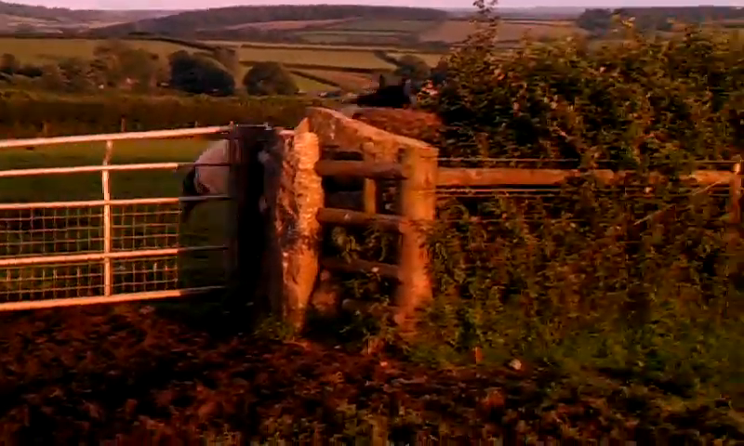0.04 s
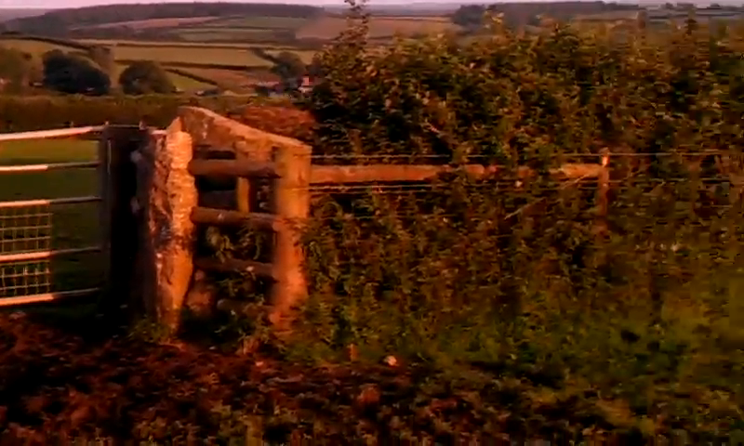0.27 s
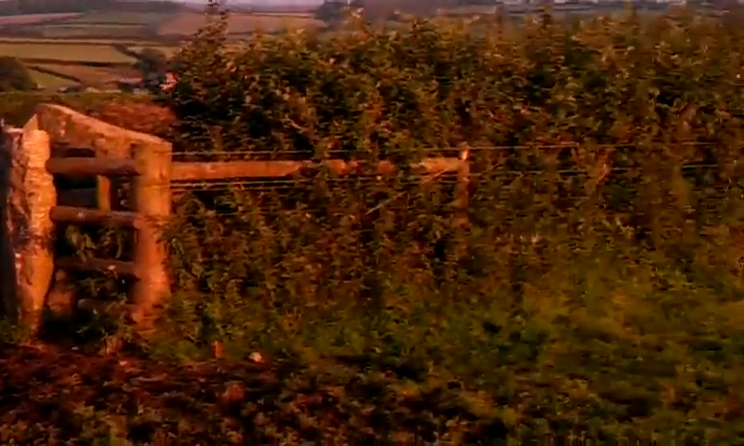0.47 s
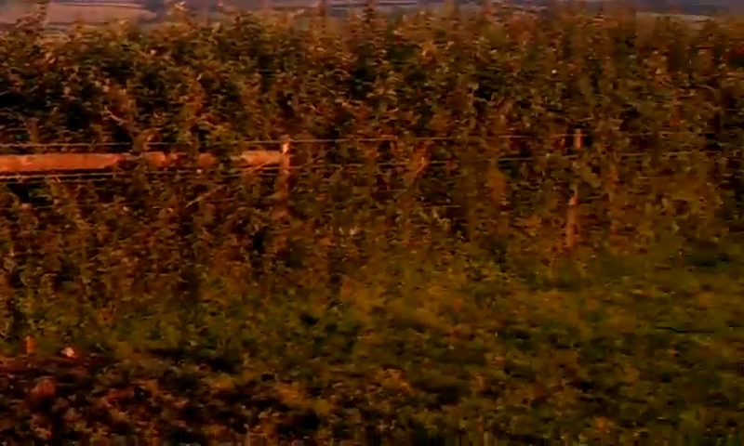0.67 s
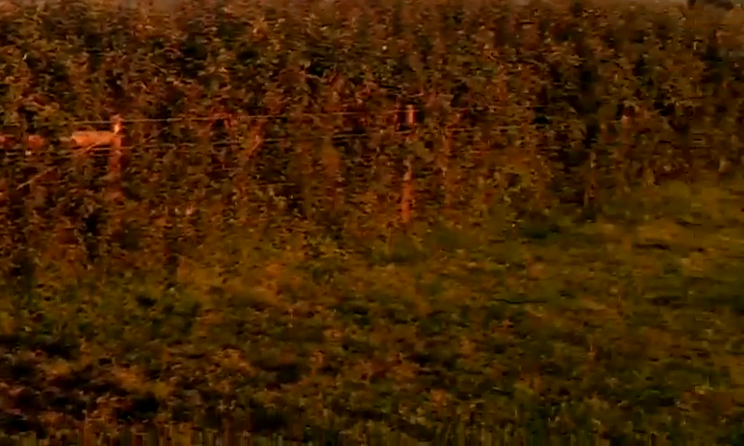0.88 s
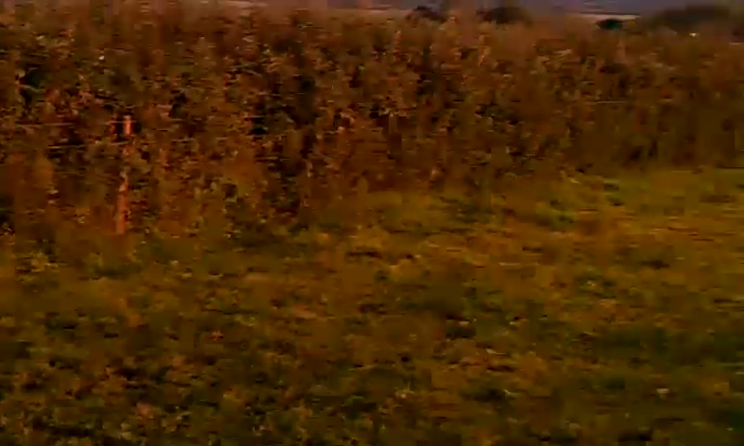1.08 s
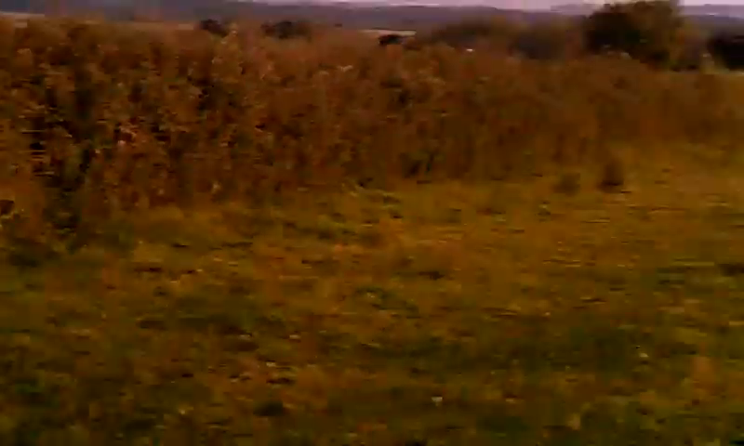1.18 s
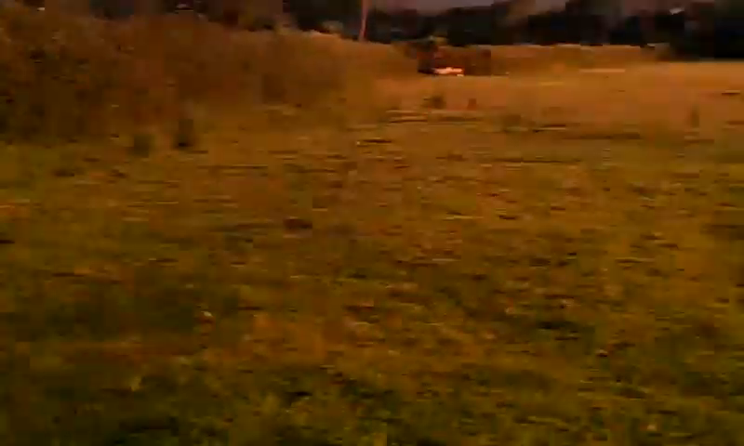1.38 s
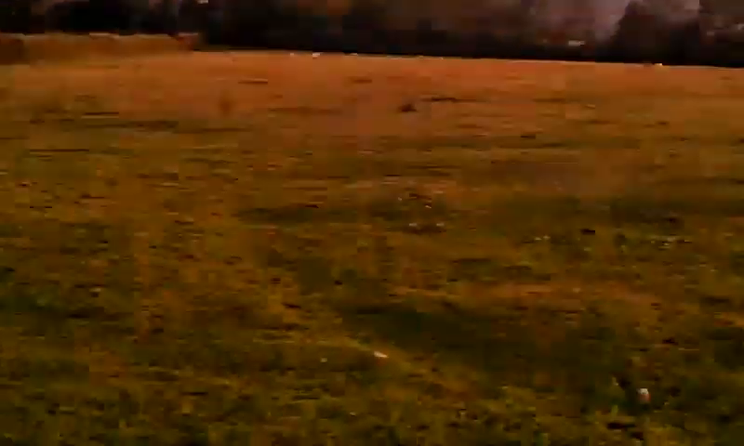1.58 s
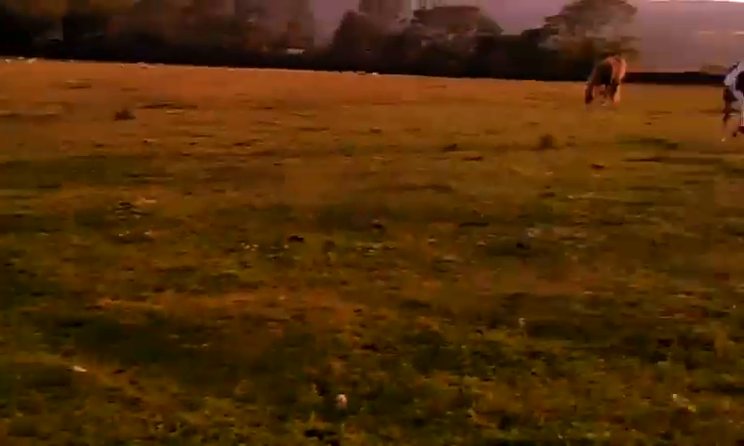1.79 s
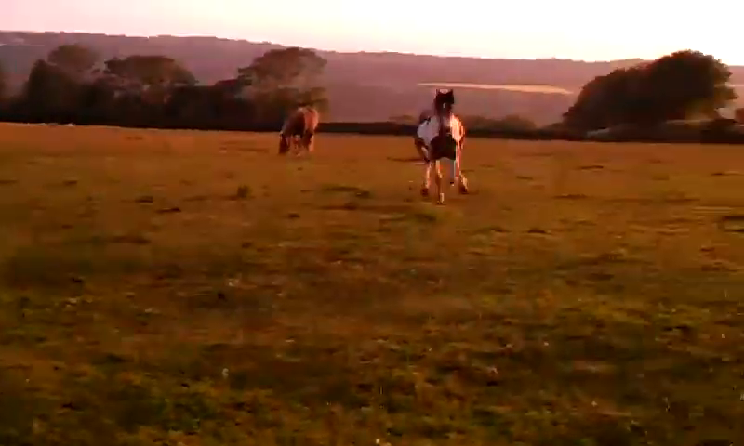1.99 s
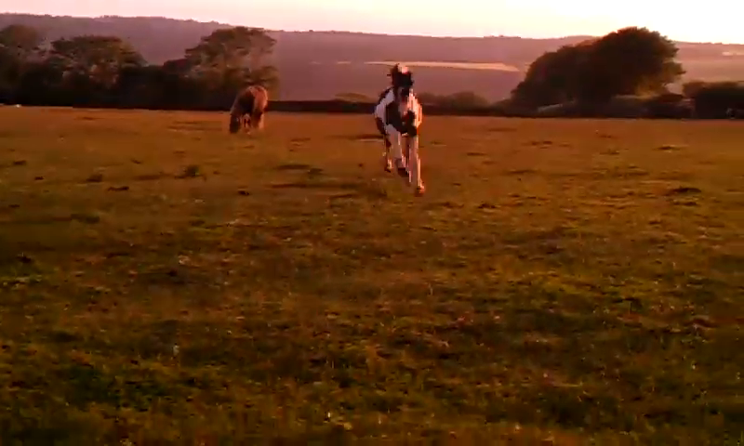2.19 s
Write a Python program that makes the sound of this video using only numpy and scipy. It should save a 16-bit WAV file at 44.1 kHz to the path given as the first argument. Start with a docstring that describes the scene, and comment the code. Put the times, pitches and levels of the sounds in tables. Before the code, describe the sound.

A horse gives one loud, shrill whinny in an open field, ending in a short rasp. Before it, a hand-held microphone knocks and rubs over faint wind and hiss. Soft thuds and two ticks follow.

```python
"""Faint wind, hiss and a rustle come first, with the knocks and rubbing of a swinging hand-held camera.
Then a horse in an open field gives one shrill whinny that arches, breaks off and ends in a short rasp.
Its voice is a high whistle, modulated by a lower second tone and roughened by turbulent breath.
Each knock excites the damped modes of the camera body, and the grip judders by stick and slip.
Soft thuds and two sharp ticks follow the call."""
import sys
import numpy as np
from scipy import signal
from scipy.fft import rfft, irfft
from scipy.io import wavfile

SR = 44100
rng = np.random.default_rng(int(sys.argv[2]) if len(sys.argv) > 2 else 0)


def put_to_file(sound):
    """Save the sound as 16-bit audio at rate SR, in the file named by the first command-line argument."""
    columns = np.atleast_2d(sound).T  # one column per channel
    safe = np.clip(columns, -1, 1)
    whole_steps = np.round(safe * 32767)
    wavfile.write(sys.argv[1], SR, whole_steps.astype(np.int16))


N = 99225


def from_db(db):
    """Amplitude ratio of a level in decibels."""
    return 10 ** (np.asarray(db) / 20)


def unit_power(x):
    """Normalisation to a mean square of one."""
    return x / np.sqrt(np.mean(x ** 2) + 1e-20)


def in_time(rows):
    """Linear interpolation of each column of a time table at every sample."""
    times, *columns = np.transpose(rows)
    return [np.interp(np.arange(N) / SR, times, column) for column in columns]


def envelope(rows):
    """Amplitude envelope of a level curve."""
    return from_db(in_time(rows)[0])


def gain_at(spectrum, hz):
    """Magnitude response, interpolated in decibels over log frequency."""
    knots, db = np.transpose(spectrum)
    return from_db(np.interp(np.log(np.maximum(hz, 1)), np.log(knots), db))


def coloured(x, spectrum):
    """Spectral shaping, normalised to unit power."""
    return unit_power(irfft(rfft(x) * gain_at(spectrum, np.arange(N // 2 + 1) * SR / N), N))


def noise(spectrum):
    """Stationary Gaussian noise with a given spectrum."""
    return coloured(rng.standard_normal(N), spectrum)


def cut(x, hz, kind="low", order=2):
    """Butterworth low- or high-pass filtering."""
    return signal.sosfilt(signal.butter(order, hz, kind, fs=SR, output="sos"), x)


def drift(hz):
    """Band-limited random fluctuation of unit power."""
    return unit_power(cut(rng.standard_normal(2 * N), hz)[N:])


def bursts(rows, spectrum, rise_s, t60_s):
    """Noise transients with linear rise and exponential decay."""
    t, level = np.arange(N) / SR, np.zeros(N)
    for peak_s, db in rows:
        rise = np.clip(1 + (t - peak_s) / rise_s, 0, 1)
        level += rise * from_db(db - 60 * np.maximum(t - peak_s, 0) / t60_s)
    return level * noise(spectrum)


def wind():
    """Turbulent pressure fluctuations at the microphone make a low rumble."""
    # gust strength (time [s], level [dB])
    gusts = [(0, -46), (.3, -43), (.5, -42), (.72, -46), (.88, -51), (1.2, -50), (1.5, -54), (1.7, -52),
             (1.9, -73), (2.25, -73)]
    # turbulence spectrum (frequency [Hz], gain [dB])
    spectrum = [(15, 1), (35, 7.5), (70, 0.5), (130, -6), (250, -16), (600, -44.5)]
    return envelope(gusts) * noise(spectrum)


def hiss():
    """Broadband background noise under slow amplitude modulation."""
    # hiss strength (time [s], level [dB])
    levels = [(0, -50.5), (.2, -59.5), (.45, -56.5), (.7, -51.5), (1.1, -60), (1.45, -54), (1.65, -50.5),
              (1.85, -55)]
    # hiss spectrum (frequency [Hz], gain [dB])
    spectrum = [(20, 10.5), (100, 11), (300, -6.5), (700, -5.5), (1500, -8), (3200, -13), (5000, -10),
                (7500, -6.5), (10000, -17), (16000, -21.5)]
    return envelope(levels) * noise(spectrum)


def rustle():
    """Random amplitude modulation makes mid-range noise grainy; short scuffs stand out of it."""
    # rustle strength (time [s], level [dB])
    levels = [(0, -50.5), (.055, -53.5), (.09, -58.5), (.15, -59), (.18, -69), (.3, -85)]
    # rustle spectrum (frequency [Hz], gain [dB])
    spectrum = [(300, -9), (700, -1.5), (1650, -12.5), (2150, -2), (2900, -19), (3800, -15), (5000, -40)]
    # scuff peaks (time [s], level [dB])
    scuffs = [(.015, -56), (.1205, -46.5), (.1405, -47)]
    # scuff spectrum (frequency [Hz], gain [dB])
    scuff_spectrum = [(1400, -21), (2100, 0), (2500, -10), (3000, -23), (12000, -30)]
    grain = unit_power(from_db(3 * drift(hz=22)))
    rustling = envelope(levels) * noise(spectrum) * grain
    return rustling + bursts(scuffs, scuff_spectrum, rise_s=0.0033, t60_s=0.071)


def rubbing():
    """Sliding friction of a hand on the camera makes low-frequency noise."""
    # friction strength (time [s], level [dB])
    levels = [(0, -43), (.13, -53), (.19, -39), (.26, -49), (.30, -32), (.34, -57), (.38, -28.5),
              (.43, -50), (.49, -16.5), (.55, -42.5), (.59, -37.5), (.66, -21), (.70, -42), (.75, -31.5),
              (.83, -30), (.90, -26), (.96, -28), (1.0, -20), (1.05, -42), (1.12, -51), (1.19, -54),
              (1.42, -57.5), (1.55, -61.5), (1.61, -40.5), (1.7, -69), (2.25, -70)]
    # friction spectrum (frequency [Hz], gain [dB])
    spectrum = [(20, -8), (50, 4.5), (90, 2.5), (140, 1), (220, -5.5), (340, -14), (500, -23.5), (800, -34),
                (1500, -114)]
    return envelope(levels) * noise(spectrum)


def knocks():
    """Impacts excite damped modes of the camera body; softer contact passes less treble."""
    # impacts (time [s], peak level [dB], cut-off [Hz])
    impacts = [(0.087, -29, 520), (0.216, -18.5, 477), (.377, -28, 784), (.383, -18.5, 704),
               (0.403, -26.5, 353), (0.4814, -14.5, 900), (0.4952, -8, 840), (0.5036, -15.5, 930),
               (0.5068, -10.5, 655), (0.573, -25, 443), (0.603, -25.5, 420), (0.6429, -6.5, 920),
               (.646, -9, 1050), (0.652, -19.5, 664), (.663, -19.5, 850), (0.673, -16.5, 970),
               (0.7874, -13.5, 466), (0.812, -26, 420), (0.886, -17, 413), (0.982, -31, 330),
               (0.996, -31, 347), (1.025, -20.5, 477), (2.2249, -28.5, 804)]
    # body modes (frequency [Hz], level [dB], T60 [s])
    modes = [(116, -7, 0.022), (200, 1.5, 0.014), (318, -19, 0.031)]
    push_t60_s, low_cut_hz = 0.0084, 55
    t, track = np.arange(N // 10) / SR, np.zeros(2 * N)
    push = from_db(-60 * t / push_t60_s)
    ring = sum(from_db(db - 60 * t / t60) * np.cos(2 * np.pi * hz * t) for hz, db, t60 in modes)
    for onset_s, db, soft_hz in impacts:
        knock = cut(cut(push + ring, soft_hz, order=5), low_cut_hz, "high")
        start = int(onset_s * SR)
        track[start:start + len(t)] -= from_db(db) * knock / np.abs(knock).max()
    return track[:N]


def judder():
    """Stick-slip oscillation of the grip gives a low, wandering tone with a weak octave."""
    # judder strength (time [s], level [dB])
    levels = [(.68, -100), (.70, -43.5), (.745, -27), (.81, -27), (.86, -22), (.91, -24.5), (.96, -38.5),
              (1.0, -20.5), (1.04, -34.5), (1.10, -36), (1.17, -58), (1.2, -100)]
    slip_hz, wobble, octave_db, flutter_db = 121.53, 0.2097, -17.5, 7
    phase = 2 * np.pi * np.cumsum(slip_hz * (1 + wobble * drift(hz=38.2))) / SR
    slips = np.sin(phase) + from_db(octave_db) * np.sin(2 * phase)
    return envelope(levels) * unit_power(slips * from_db(flutter_db * drift(hz=32)))


def whinny():
    """Biphonation: a low tone puts sidebands on a whistle's harmonics, and turbulence adds rasp."""
    # whistle fundamental (time [s], frequency [Hz])
    whistle_pitch = [(.82, 1208), (.89, 1190), (.91, 1382), (.935, 1539), (.97, 1630), (1.0, 1745),
                     (1.035, 1723), (1.066, 1784), (1.16, 1865), (1.2, 1928), (1.232, 1901), (1.258, 1839),
                     (1.292, 1888), (1.301, 1771), (1.331, 1745), (1.336, 1860), (1.343, 1755),
                     (1.378, 1696), (1.41, 1572), (1.435, 1429), (1.449, 1457), (1.456, 1612), (1.48, 1749),
                     (1.52, 1559), (1.545, 1460), (1.58, 1392), (1.61, 1231)]
    # unsteadiness at the call's ends (time [s], pitch spread [ratio])
    unsteadiness = [(.83, 0.076), (.875, 0.035), (.90, 0.0056), (1.57, 0.0028), (1.6, 0.045)]
    # whistle strength (time [s], fundamental level [dB], overtone level [dB])
    whistle_levels = [(.77, -115, -115), (.81, -57, -70), (.845, -46.5, -63), (.893, -39, -49),
                      (.912, -38, -43.5), (.97, -35, -37), (1.0, -31.5, -39), (1.04, -37, -35),
                      (1.10, -36.5, -36), (1.145, -35, -26), (1.2, -24, -23.5), (1.238, -26.5, -14.5),
                      (1.26, -32, -19), (1.292, -35.5, -23), (1.322, -33, -21.5), (1.336, -32, -21),
                      (1.347, -30.5, -26), (1.392, -42, -33.5), (1.415, -45.5, -50.5), (1.45, -40.5, -40),
                      (1.458, -55, -48.5), (1.478, -75, -61), (1.5, -88, -89), (1.515, -75, -91),
                      (1.523, -35.5, -47), (1.56, -29, -46), (1.583, -36, -68), (1.598, -45, -72),
                      (1.62, -56, -81), (1.66, -115, -115)]
    # modulating low tone (time [s], frequency [Hz], depth [0-1])
    low_tone = [(.83, 119.6, 0.4), (.87, 132.2, 0), (.89, 630, 0.23), (.925, 631.6, 0.34),
                (.955, 584.3, 0.54), (.99, 630, 0.72), (1.02, 611.8, 0.56), (1.06, 585.3, 0.05),
                (1.16, 561.3, 0.06), (1.21, 516, 0.05), (1.25, 570.7, 0.12), (1.28, 564, 0.02),
                (1.54, 597.4, 0), (1.556, 535, 0.9), (1.58, 451, 1), (1.61, 405, 0.4)]
    # low tone radiated directly at the end (time [s], level [dB])
    low_levels = [(1.52, -110), (1.55, -54.5), (1.605, -56.5), (1.64, -69), (1.7, -110)]
    # throat and mouth resonances (frequency [Hz], gain [dB])
    formants = [(2000, 1), (2400, 10), (2650, -6.5), (2900, 2), (3300, 7.5), (3600, -13.5), (3830, -15),
                (4130, 17), (4550, -24), (4950, -0.5), (5280, -2), (5600, -15), (5850, -13), (6200, -13),
                (6650, -21), (7050, -4.5), (7500, -25), (7900, -3), (9000, -37), (9700, -27), (10800, -30),
                (12000, -45), (15500, -53)]
    # shift of those resonances as the throat changes shape (time [s], factor [ratio])
    formant_shift = [(1.36, 1), (1.41, 0.96), (1.445, 0.933), (1.475, 1.05), (1.52, 0.934), (1.55, 0.91)]
    # sideband positions (offset [multiples of the low tone])
    side_steps = (-2, -1, 1, 2)
    # sideband weights (gain [dB])
    side_gains = (-5.5, -5.5, 1.5, 0)
    # resonances acting on the sidebands (frequency [Hz], gain [dB])
    side_spectrum = [(950, -17), (1350, -12), (1950, 4.5), (2300, 5), (2600, -7), (3200, 0), (4050, 1.5),
                     (4650, -14), (5300, -9), (6100, -14), (7000, -7.5), (7850, -7.5), (9500, -50)]
    # turbulence strength (time [s], level [dB])
    rasp_levels = [(.77, -105), (.81, -54), (.84, -44), (.875, -45.5), (.915, -44), (.95, -43),
                   (1.0, -30.5), (1.04, -39), (1.085, -39.5), (1.115, -56), (1.15, -53.5), (1.195, -32),
                   (1.235, -37), (1.28, -58), (1.32, -47), (1.345, -42.5), (1.385, -43), (1.42, -53),
                   (1.46, -60), (1.53, -65), (1.56, -34.5), (1.595, -43.5), (1.65, -55.5), (1.75, -78),
                   (1.85, -105)]
    # turbulence spectrum (frequency [Hz], gain [dB])
    rasp_spectrum = [(300, -26.5), (950, -21.5), (1300, -9), (1700, -3.5), (2300, 2.5), (2650, -2.5),
                     (3200, -1.5), (4000, -3.5), (4750, -8.5), (5400, -13), (6100, -33), (7100, -2.5),
                     (8000, -24), (9000, -25), (9800, -56), (16000, -52)]
    # high shelf on the voice (time [s], gain [dB])
    treble_gains = [(.84, 0), (.89, 3.5), (.93, 9), (.98, 6.5), (1.02, 9.5), (1.075, 10.5), (1.11, 6.5),
                    (1.145, -7.5), (1.2, 7.5), (1.245, -9.5), (1.29, -14), (1.325, -15), (1.37, -13),
                    (1.41, 9.5), (1.46, -9), (1.53, 7), (1.56, -4), (1.62, 1)]
    jitter, shimmer_db = 0.0252, 9  # spreads of pitch and level at full roughness
    skirt_gain, broad_rasp_db = from_db(-10) / 2, 1
    flutter_hz, shelf_hz = 92.2, 6550

    pitch, = in_time(whistle_pitch)
    shift, = in_time(formant_shift)
    first_db, upper_db = in_time(whistle_levels)
    low_hz, depth = in_time(low_tone)
    rasp = envelope(rasp_levels)
    roughness = rasp / (rasp + from_db(first_db) + from_db(upper_db))
    wobble = jitter * roughness * drift(hz=270) + in_time(unsteadiness)[0] * drift(hz=216)
    phase = 2 * np.pi * np.cumsum(pitch * (1 + wobble)) / SR
    low_phase = 2 * np.pi * np.cumsum(low_hz * (1 + 0.018 * drift(hz=124))) / SR
    beating = depth * from_db((first_db + upper_db) / 2)
    voice = envelope(low_levels) * np.sin(low_phase)
    for k in range(1, 9):
        level = from_db(first_db) if k == 1 else from_db(upper_db) * gain_at(formants, k * pitch / shift)
        blur_rad = (0.051 + 0.62 * roughness) * (k / 3) ** 2
        harmonic_phase = k * phase + blur_rad * drift(hz=270)
        voice += level * from_db(shimmer_db * roughness * drift(hz=147)) * np.sin(harmonic_phase)
        # a narrow band of turbulence surrounds each harmonic
        skirt = drift(hz=330) * np.sin(harmonic_phase) + drift(hz=330) * np.cos(harmonic_phase)
        voice += rasp * skirt_gain * gain_at(rasp_spectrum, k * pitch) * skirt
        for step, db in zip(side_steps, side_gains):
            resonance = gain_at(side_spectrum, k * pitch + step * low_hz)
            voice += beating * from_db(db) * resonance * np.sin(harmonic_phase + step * low_phase)

    # the broad rasp pulses with both tones and with a slower flutter
    flutter_phase = 2 * np.pi * np.cumsum(flutter_hz * (1 + 0.256 * drift(hz=31))) / SR
    flutter = 1 + 0.41 * np.sin(flutter_phase)
    pulsing = (1 + 0.74 * np.sin(phase)) * (1 + 1.1 * depth * np.sin(low_phase)) * flutter
    turbulence = coloured(pulsing * rng.standard_normal(N), rasp_spectrum)
    call = np.sqrt(2) * voice + rasp * from_db(broad_rasp_db) * turbulence
    bin_hz = np.arange(N // 2 + 1) * SR / N
    treble = irfft(rfft(call) / (1 + (shelf_hz / (bin_hz + 1)) ** 20), N)
    return call + (envelope(treble_gains) - 1) * treble


def breath_spray():
    """Turbulent breath makes airy noise at the hardest pushes."""
    # breath strength (time [s], level [dB])
    levels = [(.78, -100), (.83, -52), (1.0, -58), (1.05, -68), (1.12, -78), (1.16, -48), (1.2, -48),
              (1.245, -43), (1.28, -56), (1.34, -43.5), (1.42, -70), (1.52, -75), (1.555, -46.5),
              (1.62, -54), (1.72, -79.5), (1.8, -100)]
    # breath spectrum (frequency [Hz], gain [dB])
    spectrum = [(4000, -20), (6200, 5.5), (7000, 0), (8600, 7), (9700, -7.5), (11000, -8), (12500, -28)]
    return envelope(levels) * noise(spectrum)


def field_scatter(x):
    """Scattering from hedges and ground returns a weak, exponentially decaying tail."""
    gain_db, t60_s, delay_s = -19, 0.38, 0.012
    t = np.arange(N) / SR
    tail = cut(rng.standard_normal(N), hz=22000) * from_db(-60 * t / t60_s) * (t > delay_s)
    return from_db(gain_db) * signal.fftconvolve(x, tail / np.linalg.norm(tail))[:N]


def hoarse_tone(rows, wobble):
    """Random frequency and amplitude modulation broaden a sinusoid into a hoarse tone."""
    hz, db = in_time(rows)
    phase = 2 * np.pi * np.cumsum(hz * (1 + wobble * drift(hz=192))) / SR
    return np.sqrt(2) * from_db(db - 0.5 * drift(hz=145)) * np.sin(phase)


def squeals():
    """Two hoarse tones, inharmonic with the whistle, flare up within the call."""
    # squeal that climbs as the call opens (time [s], frequency [Hz], level [dB])
    upper = [(.80, 3400, -90), (.835, 3600, -74), (.86, 3980, -36.5), (.872, 4100, -80), (.888, 4150, -33),
             (.90, 4060, -51), (.922, 4300, -32), (.945, 3800, -66), (.972, 3900, -38), (.99, 4050, -23),
             (1.02, 4080, -51), (1.06, 4150, -70), (1.08, 4150, -110)]
    # squeal below the first overtone (time [s], frequency [Hz], level [dB])
    lower = [(.95, 2768, -120), (.995, 2920, -33), (1.02, 2900, -29), (1.1, 2956, -110), (1.3, 3200, -66),
             (1.345, 3040, -41), (1.385, 2794, -38), (1.46, 2700, -120)]
    return hoarse_tone(upper, wobble=0.0137) + hoarse_tone(lower, wobble=0.05)


def bright_rush():
    """A high band of noise brightens the top of the call."""
    # rush strength (time [s], level [dB])
    levels = [(1.12, -110), (1.175, -57), (1.21, -48), (1.285, -60), (1.34, -50), (1.40, -63), (1.48, -110)]
    # rush spectrum (frequency [Hz], gain [dB])
    spectrum = [(6500, -38), (8500, 6), (12400, -7), (16000, -22)]
    return envelope(levels) * noise(spectrum)


def thuds():
    """Heavily damped impacts, perhaps hooves on turf, give bursts of low noise."""
    # thud peaks (time [s], level [dB])
    impacts = [(1.816, -42.5), (1.955, -43.5), (2.028, -50.5), (2.173, -50), (2.226, -40.5)]
    # thud spectrum (frequency [Hz], gain [dB])
    spectrum = [(50, -19), (150, 2.5), (350, -6), (700, -9), (1000, -22), (8000, -30.5), (12000, -37)]
    return bursts(impacts, spectrum, rise_s=0.0036, t60_s=0.048)


def ticks():
    """Clicks of the casing decay in two stages: a fast drop, then a faint tail."""
    # clicks (time [s], relative level [dB])
    clicks = [(1.9019, -23.5), (2.226, -34.5)]
    # click spectrum (frequency [Hz], gain [dB])
    spectrum = [(1500, -27), (3500, -38), (4800, 2), (6200, -5), (8000, 9.5), (10500, -15), (16000, -28)]
    t60_s, tail_db, tail_t60_s = 0.011, -24, 0.06
    t, level = np.arange(N) / SR, np.zeros(N)
    for onset_s, db in clicks:
        age = np.abs(t - onset_s)
        decay = from_db(-60 * age / t60_s) + from_db(tail_db - 60 * age / tail_t60_s)
        level += (t >= onset_s) * from_db(db) * decay
    return level * noise(spectrum) / 2


def scene():
    """Superposition of the background, the handling and the horse in one channel."""
    outdoors = wind() + hiss() + rustle()
    grip = cut(rubbing() + judder(), hz=60.6, kind="high", order=3)
    handling = grip + knocks()
    horse = whinny() + breath_spray() + squeals() + bright_rush()
    return (outdoors + handling + horse + field_scatter(horse) + thuds() + ticks())[None]


def record(dry):
    """An elliptic low-pass filter limits the bandwidth steeply."""
    cutoff_hz = 15900
    return signal.sosfilt(signal.ellip(10, .1, 70, cutoff_hz, fs=SR, output="sos"), dry)


dry = scene()
out = record(dry)
put_to_file(out)
```